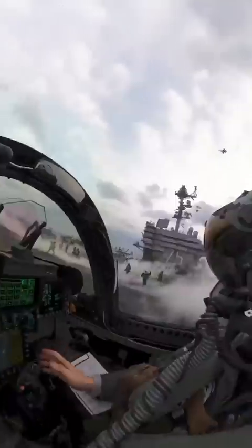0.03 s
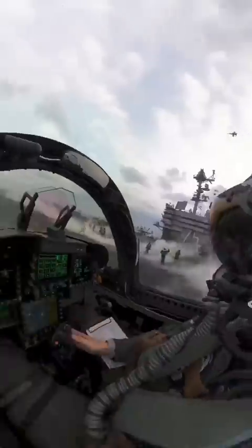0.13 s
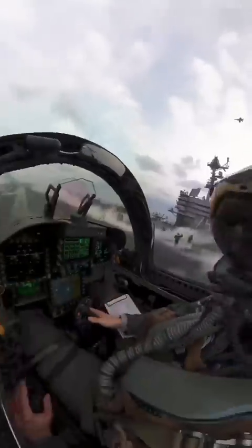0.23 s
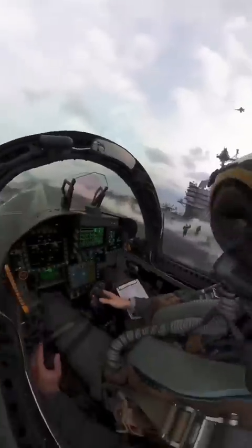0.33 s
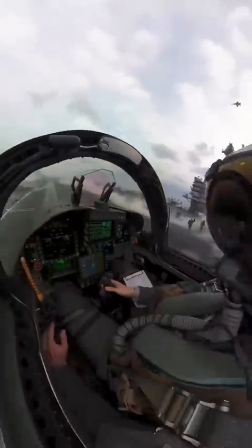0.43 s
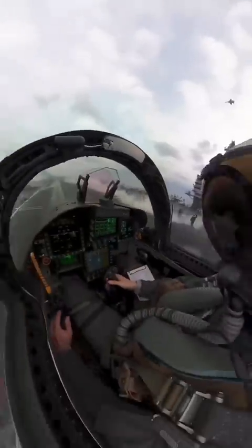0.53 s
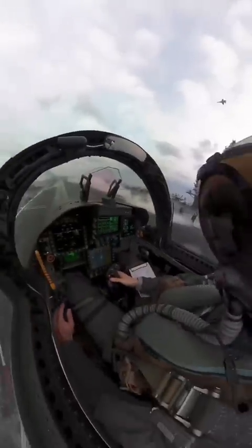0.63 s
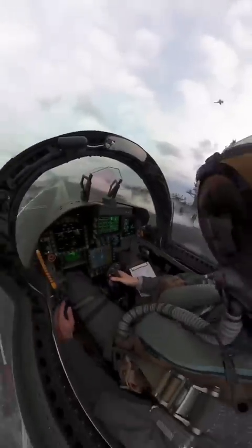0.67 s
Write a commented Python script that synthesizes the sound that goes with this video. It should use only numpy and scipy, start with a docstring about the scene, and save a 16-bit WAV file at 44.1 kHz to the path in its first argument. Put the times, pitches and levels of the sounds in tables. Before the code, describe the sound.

A fighter jet's engines run steadily, heard from inside the closed cockpit on a ship's deck: deep booming rumble, rushing mid-range roar, bright hiss and a thin wavering whine, cutting in abruptly and never pausing.

```python
"""Inside the closed cockpit of a fighter jet whose engines run steadily on a ship's deck.
Air hisses as coloured noise, with a growing fizz and a cluster of narrow duct whistles from resonant noise.
A compressor whine wavers as three harmonics, and the exhaust is a deep noise rumble that booms in the cabin
under a rush and a hollow howl. The sound is mono and cuts in abruptly after a very short silence."""
import sys
import numpy as np
from scipy import signal
from scipy.fft import rfft, irfft
from scipy.io import wavfile
from scipy.ndimage import uniform_filter1d

SR = 44100
rng = np.random.default_rng(int(sys.argv[2]) if len(sys.argv) > 2 else 0)


def unload_wav(signal):
    """Save mono or channel-first audio to the path in sys.argv[1] as 16-bit WAV at rate SR, clipped to [-1, 1]."""
    wavfile.write(
        sys.argv[1],
        SR,
        np.round(np.clip(np.atleast_2d(signal).T, -1, 1) * 32767).astype(np.int16),
    )


N = 131418  # length [samples]


def from_db(db):
    """Decibels to amplitude gain."""
    return 10 ** (np.asarray(db) / 20)


def rms_one(x):
    """Scale to rms 1."""
    return x / np.sqrt(np.mean(x ** 2) + 1e-20)


def in_time(rows):
    """Draw an automation curve through (time [s], value) points, one value per sample."""
    times, values = np.transpose(rows)
    return np.interp(np.arange(N) / SR, times, values)


def drift(rate_hz):
    """Slow random motion of rms 1: noise through two equal one-pole lowpasses with corners at rate_hz."""
    step = 40  # samples between the points of the slow curve
    run_in = 2000
    pole = np.exp(-2 * np.pi * rate_hz * step / SR)
    noise = rng.standard_normal(N // step + 2 + run_in)
    slow = signal.lfilter([1], [1, -2 * pole, pole * pole], noise)[run_in:]
    return np.interp(np.arange(N) / step, np.arange(len(slow)), rms_one(slow))


def turbulence(spectrum, flutter_db, flutter_rate, surge_db, count):
    """Turbulent flow: coloured noise in bands that flutter separately and surge together; rms 1."""
    hz, db = np.transpose(spectrum)
    log_hz = np.log(np.maximum(np.arange(N // 2 + 1) * SR / N, 1))
    # beyond the ends of the table the colour falls by about 28 dB per octave
    below = np.maximum(np.log(hz[0]) - log_hz, 0)
    above = np.maximum(log_hz - np.log(hz[-1]), 0)
    colour = from_db(np.interp(log_hz, np.log(hz), db) - 40 * (below + above))
    noise = rfft(rng.standard_normal(N)) * colour
    # neighbouring bands crossfade, evenly spaced in log frequency
    place = np.interp(log_hz, np.log([hz[0], hz[-1]]), [0, count - 1])
    total = np.zeros(N)
    for k in range(count):
        band = irfft(noise * np.maximum(1 - abs(place - k), 0), N)
        total += band * from_db(flutter_db * drift(flutter_rate))
    return rms_one(total * from_db(surge_db * drift(5.6)))


def resonance(hz, width_hz):
    """A ringing cavity: noise through two equal resonators, width_hz wide together at -3 dB; rms 1."""
    run_in = SR // 2
    r = np.exp(-np.pi * (np.pi / 2 * width_hz) / SR)  # each resonator is wider than the pair
    section = [1, 0, -1, 1, -2 * r * np.cos(2 * np.pi * hz / SR), r * r]
    return rms_one(signal.sosfilt([section, section], rng.standard_normal(N + run_in))[-N:])


def evened(x, share, window_s):
    """Even out a share (0 to 1) of the chance swings in level, like a fast leveller; rms 1."""
    power = uniform_filter1d(np.abs(signal.hilbert(x)) ** 2, int(window_s * SR))
    return rms_one(x / (power + 0.055 * power.mean()) ** (share / 2))


# colour of the hiss of intakes and cabin air: (frequency [Hz], relative density [dB per Hz])
HISS_COLOUR = [(1500, -23), (1950, -11.5), (2350, -1), (2800, -4), (3300, 0.5), (3900, -2), (4900, -6),
               (6000, -6), (6900, -1.5), (7600, -6.5), (8500, -15), (9300, -23.5), (10500, -25),
               (11500, -39.5), (13000, -37)]
# hiss fader, before its trim: (time [s], level [dB])
HISS_FADER = [(0.05, -19), (1.21, -19), (2.16, -20), (2.92, -20.5), (2.95, -20.5)]
HISS_TRIM_DB = -2.5


def hiss():
    """Air through the intakes and cabin: smooth bright noise from many small eddies."""
    level_db = in_time(HISS_FADER) + HISS_TRIM_DB
    return from_db(level_db) * turbulence(HISS_COLOUR, flutter_db=1.4, flutter_rate=21, surge_db=0.27, count=12)


# colour of the topmost fizz: (frequency [Hz], relative density [dB per Hz])
FIZZ_COLOUR = [(8300, 5), (10500, -8), (12800, -20)]
# fizz fader: (time [s], level [dB])
FIZZ_FADER = [(0.05, -60), (1.8, -45), (2.95, -41)]


def fizz():
    """Thin noise at the top of the spectrum that slowly grows; its bands only surge together."""
    return from_db(in_time(FIZZ_FADER)) * turbulence(FIZZ_COLOUR, flutter_db=0, flutter_rate=12,
                                                     surge_db=2.5, count=3)


# narrow whistles of the engine ducts, before trim and rise: (frequency [Hz], width [Hz], level [dB rms])
DUCT_WHISTLES = [(1521, 25, -46), (2061, 12, -47), (2617, 38, -38.5), (2740, 25, -43), (2885, 20, -43),
                 (2985, 28, -36), (3065, 50, -38), (3185, 55, -36.5), (3285, 35, -41), (3590, 25, -41),
                 (3843, 30, -37), (4484, 40, -41)]
WHISTLE_TRIM_DB, WHISTLE_RISE_DB_PER_S = 1, 0.5


def duct_whistles():
    """Engine ducts ringing in narrow bands of noise, all rising slowly in level."""
    from_middle_s = (np.arange(N) - N / 2) / SR
    rise = from_db(WHISTLE_TRIM_DB + WHISTLE_RISE_DB_PER_S * from_middle_s)
    return rise * sum(from_db(db) * resonance(hz, width) for hz, width, db in DUCT_WHISTLES)


BLADE_HZ = 3467  # compressor blade-passing rate
BLADE_WANDER_HZ, BLADE_JITTER_HZ = 0.79, 2.54  # rms of the slow and the fast pitch motion
# fader of the whine, before its trim: (time [s], level [dB])
WHINE_FADER = [(0.05, -27.5), (0.2, -33), (0.33, -21), (0.69, -33), (0.7, -23), (0.8, -28), (1.12, -23),
               (1.18, -32), (1.28, -21.5), (1.66, -34.5), (1.71, -21), (1.79, -33), (1.81, -20),
               (1.87, -31.5), (2.24, -25), (2.28, -29.5), (2.77, -24.5), (2.95, -20)]
# fader of its octave, before its trim: (time [s], level [dB])
OCTAVE_FADER = [(0.05, -31), (0.26, -23), (0.36, -39), (0.49, -23), (0.64, -33), (1.0, -49), (1.21, -21.5),
                (1.29, -36), (1.68, -25), (1.73, -31), (2.1, -28), (2.13, -34), (2.84, -30), (2.95, -46)]
# fader of its third harmonic: (time [s], level [dB])
THIRD_FADER = [(0.05, -64), (0.3, -55.4), (0.55, -59), (0.8, -59), (1.05, -52), (1.2, -63), (1.42, -47),
               (1.7, -62), (2.1, -55), (2.4, -46.5), (2.7, -56.4), (2.92, -49.5)]
WHINE_TRIM_DB, OCTAVE_TRIM_DB = -1.5, -4
SKIRT_HZ, SKIRT_WIDTH_HZ, SKIRT_DB = 3427, 66, -7  # noisy skirt, level against the whine's fader and trim


def compressor():
    """Three harmonics of the blade rate, scattered by the turbulent air; the first has a noisy skirt."""
    scatter, scatter_rate = 0.35, 25  # rms share of the tone, rate [Hz]
    hz = BLADE_HZ + BLADE_WANDER_HZ * drift(3.12) + BLADE_JITTER_HZ * drift(54.2)
    phase = 2 * np.pi * np.cumsum(hz) / SR
    whine_db = in_time(WHINE_FADER) + WHINE_TRIM_DB
    octave_db = in_time(OCTAVE_FADER) + OCTAVE_TRIM_DB
    third_db = in_time(THIRD_FADER)
    tones = np.zeros(N)
    for harmonic, db in enumerate([whine_db, octave_db, third_db], 1):
        # random in-phase and quadrature parts blur both level and phase
        in_phase = (1 + scatter * drift(scatter_rate)) * np.sin(harmonic * phase)
        quadrature = scatter * drift(scatter_rate) * np.cos(harmonic * phase)
        tones += from_db(db) * np.sqrt(2) * (in_phase + quadrature)
    skirt = from_db(whine_db + SKIRT_DB) * resonance(SKIRT_HZ, SKIRT_WIDTH_HZ)
    return tones + skirt


# colour of the jet's rush through the canopy: (frequency [Hz], relative density [dB per Hz])
RUSH_COLOUR = [(300, -7), (520, -0.5), (800, -3), (1130, -3), (1350, -7.5), (1620, -5.5), (1900, -9.5),
               (2600, -22)]
# rush fader: (time [s], level [dB])
RUSH_FADER = [(0.05, -27), (1.2, -26), (1.8, -25), (2.95, -27.5)]


def exhaust_rush():
    """The jet heard through the canopy: fluttering mid-range turbulence."""
    return from_db(in_time(RUSH_FADER)) * turbulence(RUSH_COLOUR, flutter_db=1.25, flutter_rate=23,
                                                     surge_db=0.72, count=8)


HOWL_HZ, HOWL_WIDTH_HZ = 786, 147
# howl fader: (time [s], level [dB])
HOWL_FADER = [(0.05, -49), (2.0, -37), (2.5, -31), (2.95, -30.5)]


def exhaust_howl():
    """A hollow resonant band of the roar that builds up."""
    return from_db(in_time(HOWL_FADER)) * resonance(HOWL_HZ, HOWL_WIDTH_HZ)


BOOM_HZ, BOOM_WIDTH_HZ, BOOM_TRIM_DB = 99.1, 6.2, -1  # the cabin's main resonance
# boom fader, before its trim: (time [s], level [dB])
BOOM_FADER = [(0.05, -21), (0.17, -15), (0.32, -27), (0.46, -13.5), (0.6, -25.5), (0.74, -15.5),
              (0.95, -29.5), (1.16, -20.5), (1.35, -23.1), (1.5, -18.5), (1.75, -27.5), (2.0, -18.5),
              (2.2, -35), (2.35, -30), (2.68, -22.5), (2.9, -16.5)]


def cabin_boom():
    """The cabin's main resonance, evened out so that its fader draws the swells."""
    boom = evened(resonance(BOOM_HZ, BOOM_WIDTH_HZ), share=1, window_s=0.048)
    return from_db(in_time(BOOM_FADER) + BOOM_TRIM_DB) * boom


# colour of the exhaust rumble: (frequency [Hz], relative density [dB per Hz])
RUMBLE_COLOUR = [(20, -7), (38, -5.5), (54, -2.5), (80, -1), (135, -1.5), (200, -7.5), (245, -13),
                 (320, -9), (440, -15.5), (600, -31)]
# other cabin resonances: (frequency [Hz], width [Hz], level against the rumble noise [dB])
CABIN_RESONANCES = [(54.3, 13.5, -14), (132.6, 12.4, -10), (187, 8.5, -13.5), (279.8, 24.4, -8.5),
                    (330.8, 27.4, -14)]
# fader of rumble and resonances, before its trim: (time [s], level [dB])
RUMBLE_FADER = [(0.05, -19), (0.5, -19.5), (1.0, -19.5), (1.6, -19), (1.9, -18.0), (2.15, -17), (2.45, -19),
                (2.9, -19)]
RUMBLE_TRIM_DB = 2.5


def exhaust_rumble():
    """Deep turbulent exhaust noise, coloured by the cabin's resonances and partly evened out."""
    rumble = turbulence(RUMBLE_COLOUR, flutter_db=0.3, flutter_rate=4.4, surge_db=1.6, count=8)
    cabin = sum(from_db(db) * resonance(hz, width) for hz, width, db in CABIN_RESONANCES)
    level_db = in_time(RUMBLE_FADER) + RUMBLE_TRIM_DB
    return from_db(level_db) * evened(rumble + cabin, share=0.7, window_s=0.033)


def scene():
    """All sources from background to main, alike in both channels."""
    air = hiss() + fizz() + duct_whistles()
    exhaust = exhaust_rush() + exhaust_howl() + cabin_boom() + exhaust_rumble()
    return np.tile(air + compressor() + exhaust, (2, 1))


START_S = 0.036  # silence before the sound cuts in
TOP_STOP_HZ = 13700  # from here up the lowpass is at least 70 dB down


def record(dry):
    """The sound cuts in, peaks are softly rounded, the top is cut."""
    on = np.arange(N) / SR >= START_S
    rounded = 1.51 * np.tanh(dry / 1.48)
    lowpass = signal.cheby2(16, 70, TOP_STOP_HZ, fs=SR, output="sos")
    return signal.sosfilt(lowpass, on * rounded)


dry = scene()
out = record(dry)
unload_wav(out)
```